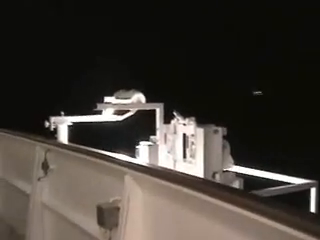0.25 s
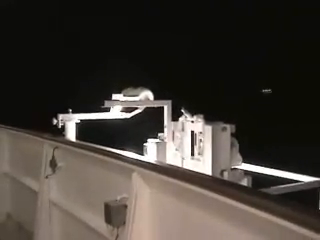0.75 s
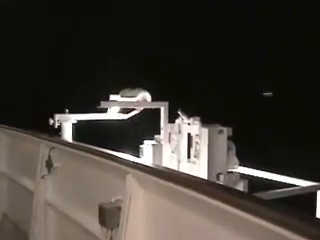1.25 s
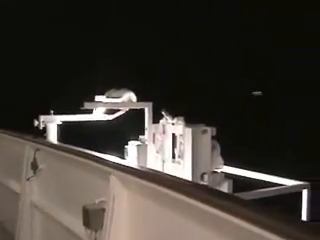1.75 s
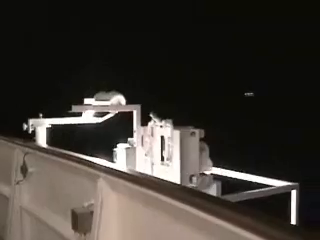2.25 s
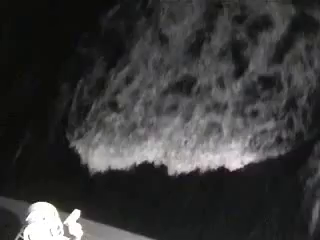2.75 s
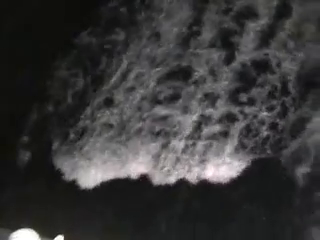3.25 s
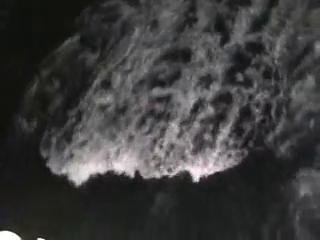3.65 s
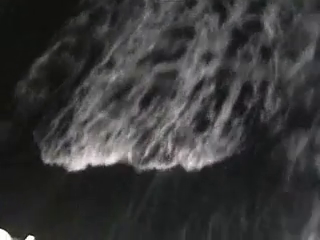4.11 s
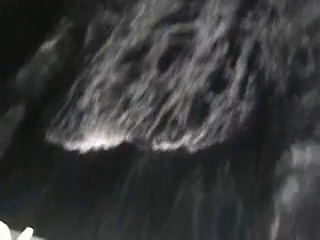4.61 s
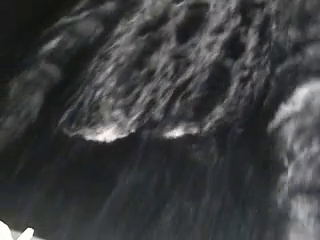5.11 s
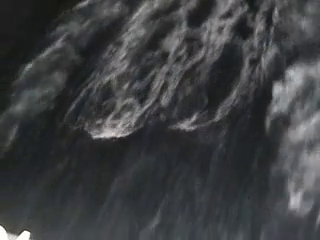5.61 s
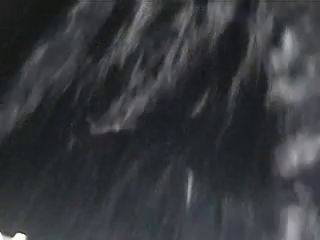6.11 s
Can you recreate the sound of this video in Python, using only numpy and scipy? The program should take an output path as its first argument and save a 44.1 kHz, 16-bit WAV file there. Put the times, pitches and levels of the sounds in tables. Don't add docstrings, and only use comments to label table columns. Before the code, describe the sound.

A steady broad rush of sea water streams past a ship's hull, close and enveloping, with a faint engine hum beneath. It swells slightly after the first second. Near three seconds a very soft low bump marks a change to spray over the rail, then the treble dulls over the wake. Heard outdoors from the deck through a small handheld stereo microphone, with slightly watery, whistling treble.

```python
import sys
import numpy as np
from scipy import signal
from scipy.fft import dct
from scipy.io import wavfile
from scipy.ndimage import uniform_filter1d

SR = 44100
rng = np.random.default_rng(int(sys.argv[2]) if len(sys.argv) > 2 else 0)


def volts_from_db(level):
    exponent = np.asarray(level, float) / 20
    return 10 ** exponent


def to_wav(sig):
    pcm = np.clip(np.atleast_2d(sig), -1, 1) * 32767
    pcm = np.round(pcm).astype(np.int16)
    wavfile.write(sys.argv[1], SR, pcm.T)


N = 280917


def along(rows, t):
    s, *columns = np.transpose(rows)
    return [np.interp(t, s, c) for c in columns]


def evened(x):
    return x / np.sqrt(np.mean(x ** 2) + 1e-20)


CUT_S, CUT_LENGTH_S = 2.9, 0.03
TILT_START_S, TILT_EASE_S = 3.57, 0.37


def view_at(t):
    tilt = np.maximum(t - TILT_START_S, 0) / TILT_EASE_S
    cut = np.clip((t - CUT_S) / CUT_LENGTH_S + 0.5, 0, 1)
    return cut + 1 - np.exp(-tilt ** 1.3)


# start_s, level_db
RUSH = [
    (0, -21),
    (.35, -21.5),
    (.9, -19),
    (2.9, -18.5),
    (3.6, -18.5),
    (4.0, -19),
    (4.3, -18.5),
    (5.3, -18.5),
    (6.37, -18),
]
FULL_DB = -20


def swelling_db(t):
    return np.minimum(along(RUSH, t)[0] - FULL_DB, 0)


def seen_db(table, hz, view, slide, overlap=False):
    table_hz, *spectra = np.transpose(table)
    log_hz = np.log(table_hz)
    sliding = np.interp(hz, [1506, 4020, 5540, 7700], [0, 1, 1, 0])[:, None]
    stretch = 1 + slide * sliding * (2 - view)
    deck, spray = (np.interp(np.log(hz + 1), log_hz, s)[:, None] for s in spectra[:2])
    wake = np.interp(np.log(hz[:, None] / stretch + 1), log_hz, spectra[2])
    level = deck + (spray - deck) * np.clip(view, 0, 1)
    down = np.clip(view - 1, 0, 1)
    if overlap:
        return 10 * np.log10((1 - down) * volts_from_db(2 * level) + down * volts_from_db(2 * wake))
    return level + (wake - level) * down


# pitch_hz, deck_db, spray_db, wake_db
MID = [(49.7, -53.5, -57.5, -42.5), (104.9, -34, -33.5, -32), (207.4, -18, -19, -19.5),
       (381, -11.5, -8, -9), (582, -9.5, -13, -13.5), (1352, -12.5, -10, -12), (2240, -15.5, -16.5, -13.5),
       (3180, -19.5, -20, -11), (3654, -19, -19, -15.5), (4397, -19.5, -20, -25.5), (4990, -20, -19.5, -35),
       (5570, -21.5, -23.5, -39.5), (6150, -26.5, -25, -39.5), (7090, -29, -29.5, -47),
       (7910, -34.5, -33, -46), (8320, -33.5, -31, -39.5), (8790, -31, -29.5, -39.5),
       (9850, -31.5, -31.5, -41), (10130, -33.5, -30.5, -46), (10930, -38, -34.5, -43),
       (11740, -43, -35, -43), (12500, -51, -50, -73)]
# pitch_hz, deck_db, spray_db, wake_db
WIDE = [(146.6, -60, -71.5, -45), (451, -27, -28.5, -24), (1210, -28.5, -27, -26), (2200, -30.5, -31, -28),
        (3493, -32.5, -43, -28), (4510, -35, -32, -37), (5640, -42.5, -38, -41), (6620, -32.5, -41.5, -37),
        (7700, -33, -34.5, -26), (8450, -24.5, -27, -43), (10050, -34, -41, -47), (13400, -52, -59, -55)]
# centre_s, depth_db
LULLS = [
    (3.191, -2.5),
    (3.951, -2.5),
    (4.598, -0.5),
    (5.82, -2.5),
]
# start_s, width_db
WIDTH = [
    (0, 0),
    (1.0, 0),
    (1.7, 0),
    (2.0, -3.5),
    (2.88, -2),
    (2.92, -1),
    (3.5, 0),
    (3.8, 1),
    (4.3, 0),
    (6.37, 0),
]
LULL_S = 0.023
FIZZ_PER_DB, WIDE_PER_DB = 0.25, 1.5


def water():
    hz, t, z = signal.stft(rng.standard_normal((2, N)), SR, nperseg=1024, noverlap=768)
    lulls_db = sum(db * np.exp(-((t - s) / LULL_S) ** 2) for s, db in LULLS)
    level_db = along(RUSH, t)[0] + lulls_db
    view = view_at(t)
    fizz_db = FIZZ_PER_DB * swelling_db(t)
    wide_db = WIDE_PER_DB * swelling_db(t) + along(WIDTH, t)[0]
    patches = rng.standard_normal((len(t), len(hz))).T
    patches = uniform_filter1d(patches, size=14, axis=0)
    patches = evened(uniform_filter1d(patches, size=14, axis=1))
    slosh = evened(uniform_filter1d(rng.standard_normal(len(t)), size=8))
    common_db = level_db + 20.5 + 0.8 * patches + 0.34 * slosh
    common_db = common_db + fizz_db * np.clip(hz[:, None] / 6000, 0, 1) ** 2
    mid_db = seen_db(MID, hz, view, slide=0.42)
    side_db = seen_db(WIDE, hz, view, slide=0.086, overlap=True) + wide_db
    z *= volts_from_db(common_db + np.array([mid_db, side_db]))
    return signal.istft(z, SR, nperseg=1024, noverlap=768)[1][:, :N]


# pitch_hz, width_hz, deck_db, rail_db
HUM = [(84, 2.2, -59, -66.5), (120.8, 1.3, -57, -51.5), (219.4, 1.2, -41.5, -47), (303.2, 3.5, -43.5, -49),
       (379.7, 7.4, -45, -40), (404, 4, -34.5, -34.5)]
# start_s, strength_db, wavering_rad
ENGINE = [(0, -0.5, 0.12), (0.9, 1.5, .12), (1.45, 2, 0.36), (1.8, -0.5, 0.81), (2.2, 3, 0.53),
          (2.85, -12, 0.33), (3.0, 1, 1.1), (3.5, -1.5, 1.7), (4.2, 1, 0.92), (5.1, -5.5, 1.1),
          (5.6, 3.5, 0.59), (6.37, -2.5, 1.07)]
HUM_PER_DB = -1.8
WAVER_HZ = 400


def hum():
    t = np.arange(N) / SR
    out = np.zeros(N)
    over_rail = np.clip(view_at(t), 0, 1)
    strength_db, wavering_rad = along(ENGINE, t)
    sunk_db = HUM_PER_DB * swelling_db(t)
    for hz, width_hz, deck_db, rail_db in HUM:
        pole = np.exp(-np.pi * width_hz / SR)
        waver = evened(signal.lfilter([1], np.poly([pole, pole]), rng.standard_normal(N)))
        share = hz / WAVER_HZ
        tone = np.sqrt(2) * np.sin(2 * np.pi * hz * t + share * wavering_rad * waver)
        level_db = deck_db + (rail_db - deck_db) * over_rail + sunk_db + share * strength_db
        out += volts_from_db(level_db) * tone
    return out


def click():
    start_s, peak_db, length_s = 2.905, -29.5, 0.0024
    return volts_from_db(peak_db) * np.exp(-((np.arange(N) / SR - start_s) / length_s) ** 2)


def scene():
    mid, side = water()
    mid = mid + hum() + click()
    return np.array([mid + side, mid - side])


LEAD, HOP = 11854, 2048
TREBLE_BAND = 16


def gap_hiss_db(t, line_hz):
    views_db = (-51.5, -49.5, -56)
    level_db = np.interp(view_at(t), np.arange(3), views_db) + 2.5 * swelling_db(t)
    level_db = (level_db - 1.5 * np.maximum(t - TILT_START_S, 0))[:, None]
    return level_db - 0.5 * np.clip((12400 - line_hz) / 1000, 0, 1)


def whistles_and_hiss(pair):
    slope, base_db, bass_db, wake_treble_db = 0.42, -6.5, -3.0, -3.5
    side_share, quiet_db = 0.12, -34.5
    mask_db, mask_lines, ragged_db, ragged_lines = 15, 110, 4, 32
    slow = signal.resample_poly(np.pad(pair, ((0, 0), (LEAD, LEAD))), 320, 441, axis=1)
    count = slow.shape[1] // HOP - 1
    window = np.sin(np.pi * (np.arange(2 * HOP) + 0.5) / (2 * HOP))
    frames = slow[:, HOP * np.arange(count)[:, None] + np.arange(2 * HOP)] * window
    a, b, c, d = np.split(frames, 4, axis=2)
    folded = np.concatenate([-c[..., ::-1] - d, a - b[..., ::-1]], axis=2)
    lines = dct(folded, 4, norm="ortho")
    line_hz = np.arange(HOP) * 16000 / HOP
    t = (np.arange(count) + 1) * HOP / 32000 - LEAD / SR

    band = np.floor(6 * np.arcsinh(line_hz / 600)).astype(int)
    member = np.eye(band.max() + 1)[band]
    power = (lines[0] ** 2 + side_share * lines[1] ** 2) @ member / member.sum(0)
    band_db = 10 * np.log10(uniform_filter1d(power, size=3, axis=0) + volts_from_db(2 * quiet_db))
    down = np.clip(view_at(t) - 1, 0, 1)[:, None]
    finer_db = wake_treble_db * (band > TREBLE_BAND) * down + bass_db * (band < 2)
    step = volts_from_db(slope * band_db[:, band] + base_db + finer_db)
    rounded = step * np.round(lines / step)

    fill_db = gap_hiss_db(t, line_hz)
    fill = volts_from_db(fill_db) * np.sqrt(3) * rng.uniform(-1, 1, lines.shape)
    near = rounded[::-1] ** 2 + 0.22 * (band > TREBLE_BAND) * rounded ** 2
    near = uniform_filter1d(near, size=mask_lines, axis=2, origin=mask_lines // 3)
    near = uniform_filter1d(near, size=2, axis=1)
    ragged = rng.exponential(1, (2, count, HOP // ragged_lines))
    ragged = np.repeat(ragged, ragged_lines, axis=2) * (band > TREBLE_BAND + 2)
    fill *= near < volts_from_db(2 * (fill_db + mask_db - ragged_db * ragged))

    u, v = np.split(dct(rounded + fill, 4, norm="ortho"), 2, axis=2)
    unfolded = np.concatenate([v, -v[..., ::-1], -u[..., ::-1], -u], axis=2) * window
    head, tail = np.split(unfolded, 2, axis=2)
    head[:, 1:] += tail[:, :-1]
    return signal.resample_poly(head.reshape(2, -1), 441, 320, axis=1)[:, LEAD:LEAD + N]


def top_cut(x):
    return signal.sosfilt(signal.butter(12, 15750, fs=SR, output="sos"), x)


def record(dry):
    mid, side = whistles_and_hiss(np.array([dry[0] + dry[1], dry[0] - dry[1]]) / 2)
    return top_cut(np.array([mid + side, mid - side]))


dry = scene()
out = record(dry)
to_wav(out)
```